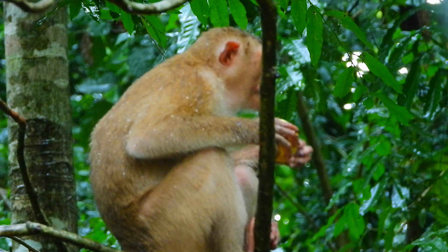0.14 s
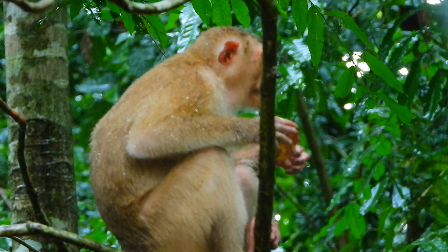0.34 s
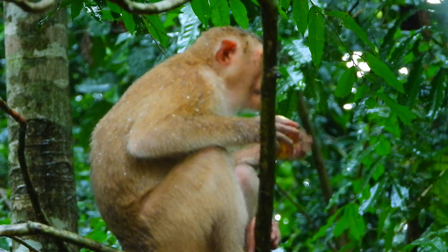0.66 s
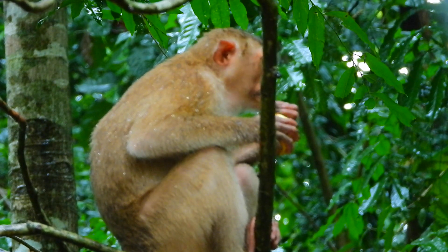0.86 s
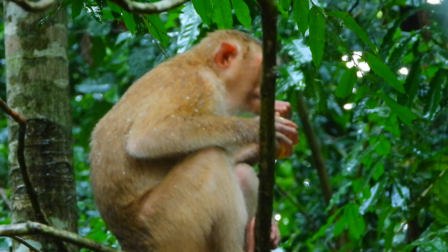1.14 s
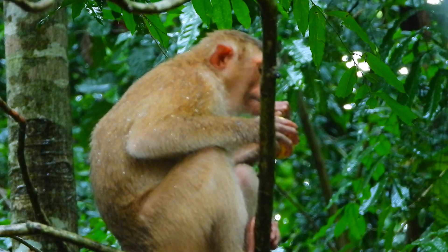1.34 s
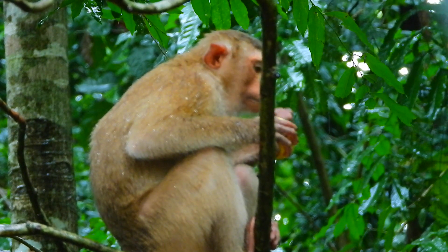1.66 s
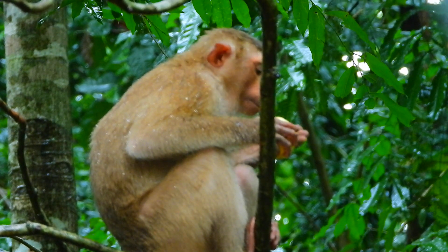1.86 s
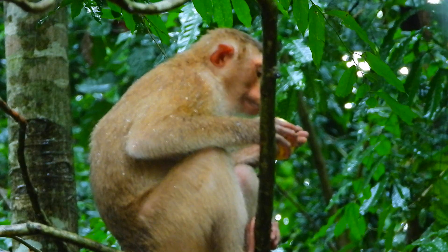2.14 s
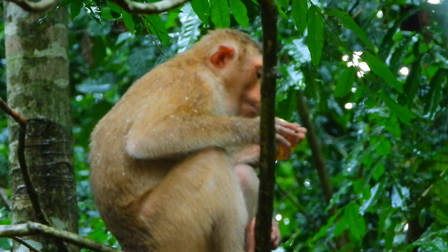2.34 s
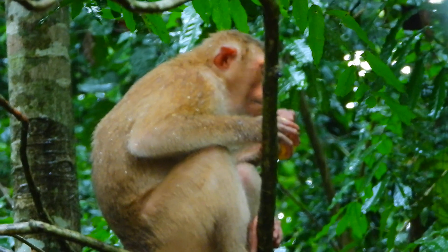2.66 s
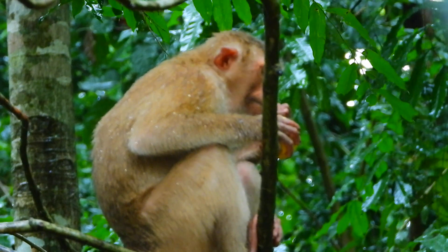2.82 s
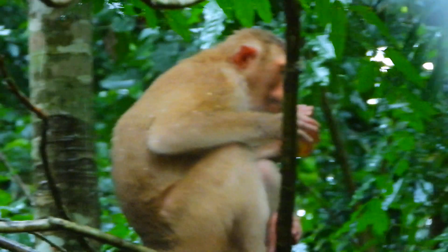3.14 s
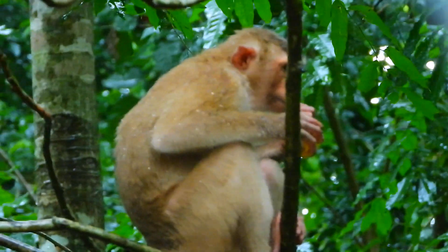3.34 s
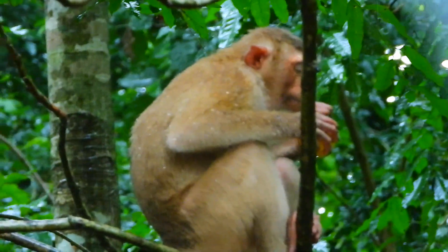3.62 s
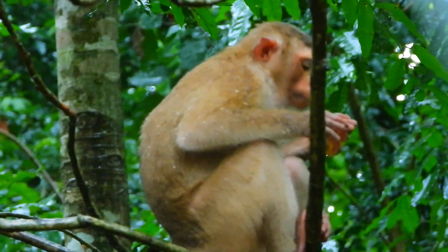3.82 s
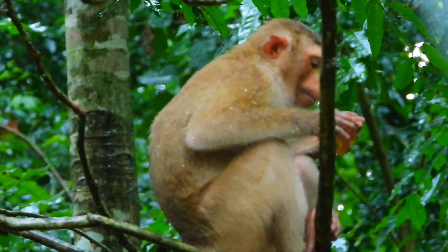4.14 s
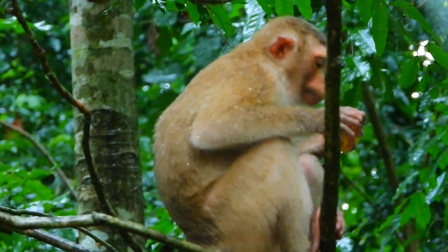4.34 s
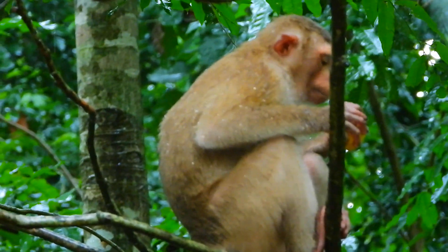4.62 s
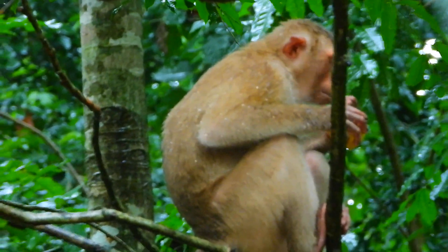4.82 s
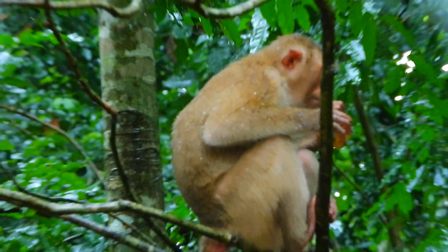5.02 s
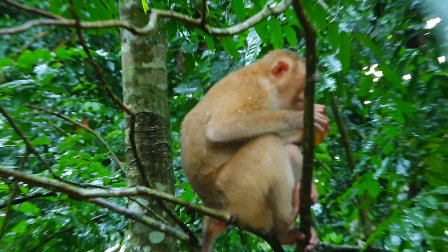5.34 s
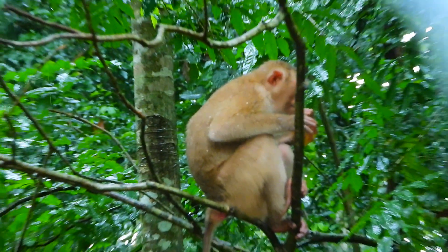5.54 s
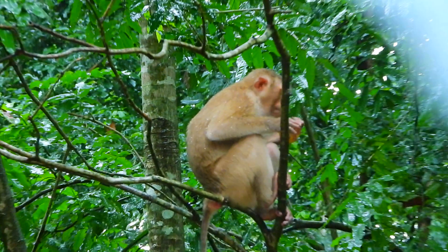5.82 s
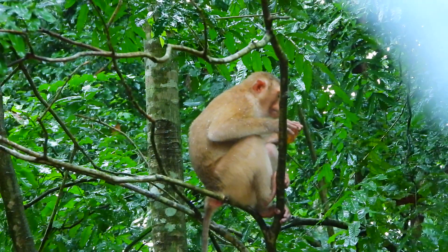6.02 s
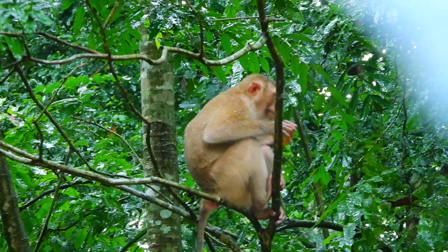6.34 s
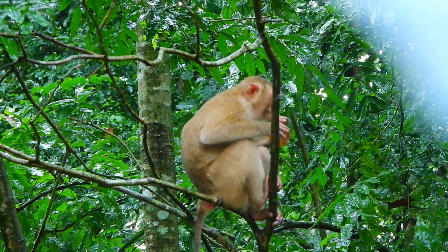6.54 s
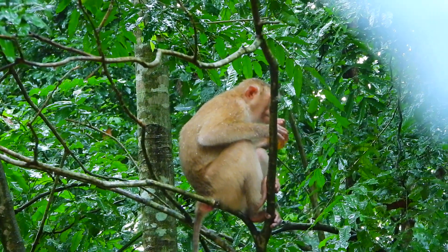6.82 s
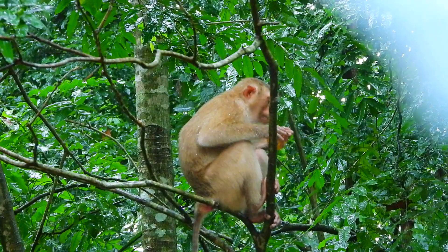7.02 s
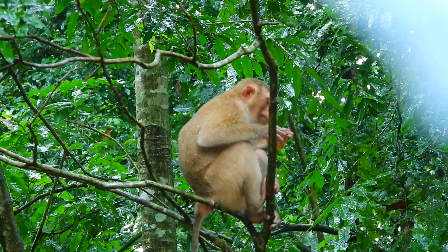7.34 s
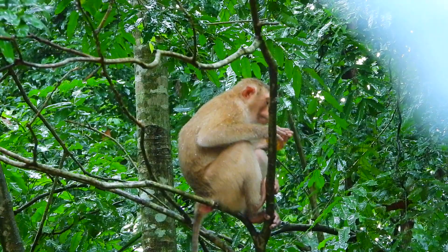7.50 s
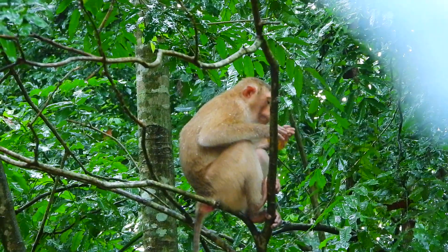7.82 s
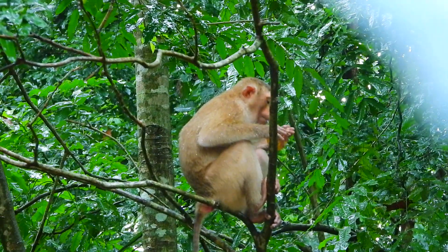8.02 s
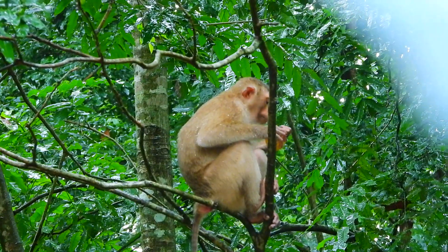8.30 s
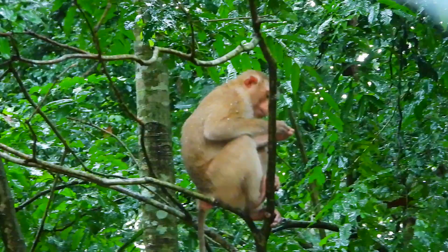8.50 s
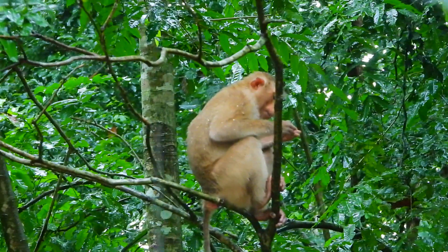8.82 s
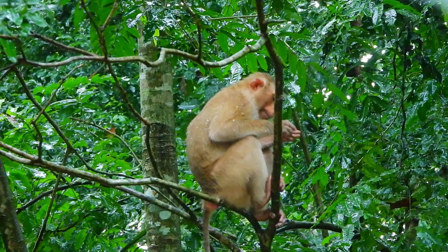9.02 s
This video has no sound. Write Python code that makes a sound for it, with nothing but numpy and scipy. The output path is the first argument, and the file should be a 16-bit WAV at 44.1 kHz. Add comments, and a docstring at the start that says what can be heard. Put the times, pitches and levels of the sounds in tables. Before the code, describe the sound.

Outdoors among wet trees, rain falls evenly as a bright hiss with fine drops. Very close to the built-in stereo microphones, hands shift on the camera: irregular knocks, clicks, skin scrapes and low rubbing, thickest from three to five seconds and again around six. The rain drops back at the knocks and recovers. After a last click at eight seconds all sound cuts out briefly, then plain rain returns. The monkey itself is not heard.

```python
"""Dense rain hisses on forest leaves: steady noise and random drops, coloured by bearing as the camera turns.
From 2.3 s fingers thump and tick on the camera body: short damped vibrations of its modes.
The palm rumbles on the grip and skin scuffs the casing, both as filtered, swelling noise.
The rain level is reset at listed times, mostly downward, and creeps back; late on all sound is cut for
half a second. Two microphone ports hear each source with their own levels and, for the rain, phases."""
import sys
import numpy as np
from scipy import signal
from scipy.io import wavfile
from scipy.ndimage import uniform_filter1d

SR = 44100
rng = np.random.default_rng(int(sys.argv[2]) if len(sys.argv) > 2 else 0)


def generate_wav(sig):
    """Save sig (samples, or channels by samples) to the path in sys.argv[1] as 16-bit PCM at SR."""
    pcm = np.round(np.clip(np.atleast_2d(sig).T, -1, 1) * 32767).astype(np.int16)
    wavfile.write(sys.argv[1], SR, pcm)


def amplitude_ratio(level_db):
    """Convert a level in decibels to the matching linear amplitude (field) ratio."""
    exponent = np.asarray(level_db, float) / 20
    return 10 ** exponent


N = 403956  # samples
HAND_LEN = round(0.08 * SR)  # samples computed for each thump or tick

# The bearing of the turning camera. Each row: time in seconds, facing (0 = first bearing, 1 = second).
FACING = [(0, 0.094), (2.9, 0.019), (3.85, 0.51), (3.92, 0.83), (8.04, 0.73), (8.56, 0.13)]


def evened(x):
    """Normalises power: scales to rms 1."""
    return x / np.sqrt(np.mean(x ** 2) + 1e-20)


def banded(x, low_hz, high_hz):
    """Band-pass filtering selects a range of pitch; the result has rms 1."""
    sos = signal.butter(2, [low_hz, high_hz], "band", fs=SR, output="sos")
    return evened(signal.sosfilt(sos, x))


def swell(length):
    """Damped envelope: rises softly, peaks at 1 after 0.71 of the length in seconds, then dies quickly."""
    u = np.arange(HAND_LEN) / (length * SR)
    return np.sqrt(2 * np.e) * u * np.exp(-u ** 2)


def knock(hz, length):
    """Damped resonance: one mode swells and is damped by the hand."""
    t = np.arange(HAND_LEN) / SR
    return swell(length) * np.sin(2 * np.pi * hz * t)


def add(mix, s, sound, pan_db=0):
    """Superposition: adds a sound from time s, with a level difference (left minus right) at the ports."""
    part = mix[:, round(s * SR):][:, :sound.shape[-1]]
    gains = amplitude_ratio(np.array([[pan_db / 2], [-pan_db / 2]]))
    part += gains * sound[..., :part.shape[1]]


def read(points, hz):
    """Interpolates spectra on a logarithmic frequency axis, one column of values each."""
    f, *values = np.transpose(points)
    return np.array([np.interp(np.log(hz + 1), np.log(f + 1), v)[:, None] for v in values])


def drift(shape, bins, frames):
    """Correlated random field: noise averaged over frequency bins and time frames, rms 1."""
    noise = rng.standard_normal(shape)
    return evened(uniform_filter1d(uniform_filter1d(noise, bins, axis=0), frames, axis=1))


def drops(per_s, spread_db, size):
    """Shot noise: drops at random instants, a few large, each a tiny decaying burst of noise."""
    sizes = amplitude_ratio(spread_db * np.minimum(rng.exponential(1, size), 3.5))
    hits = (rng.random(size) < per_s / SR) * sizes
    burst = np.exp(-np.arange(300) / (0.0014 * SR))
    power = signal.oaconvolve(hits ** 2, burst ** 2)[:size]  # the powers of overlapping drops add
    return evened(np.sqrt(abs(power)) * rng.standard_normal(size))


def rain_level_db():
    """Sawtooth gain: each row resets the level, which climbs at a steady rate to its ceiling."""
    # Resets of the rain level, mostly downward. Each row: time in seconds, level just after in dB.
    resets = [(0, -31), (2.37, -34.5), (2.62, -33), (2.865, -36.5), (2.915, -46.5), (3.31, -43.5),
              (3.46, -44), (3.885, -48), (4.1, -47.5), (4.32, -44.5), (4.58, -42), (4.715, -43.5),
              (5.73, -35), (6.34, -34.5), (6.42, -36), (6.99, -33.5), (8.3, -29)]
    # The ceiling of the climb: level at the first bearing in dB, level at the second in dB.
    steady_db = (-28.5, -25.5)
    creep_db_per_s, step_s = 8.5, 0.015
    t = np.arange(N) / SR
    s, after_db = np.transpose(resets)
    last = np.searchsorted(s, t, "right") - 1
    facing = np.interp(t, *np.transpose(FACING))
    ceiling_db = (1 - facing) * steady_db[0] + facing * steady_db[1]
    level_db = np.minimum(after_db[last] + creep_db_per_s * (t - s[last]), ceiling_db)
    return uniform_filter1d(level_db, round(step_s * SR))


def rain():
    """Filtered noise with partial coherence: hiss and drops, coloured by bearing, at two ports."""
    # Colour of the rain at each bearing. Each row: frequency in Hz, relative level in dB per Hz.
    first_colour = [(30, -52), (87, -35.5), (200, -9), (320, -7), (410, -3), (520, -2.5), (1000, -0.5),
                    (1900, 2), (2600, -2), (3700, -2), (4400, 0.5), (5000, -1.5), (6000, -8.5), (8000, -18),
                    (8900, -22), (11300, -29), (14000, -39.5), (15000, -44.5), (16200, -57)]
    second_colour = [(30, -55.5), (87, -34.5), (200, -9), (260, -9.5), (400, -5), (1000, -1), (2100, 2),
                     (2900, -0.5), (3600, 2), (4400, -5.5), (5300, -14), (6500, -13.5), (8000, -18),
                     (8900, -23), (11300, -32.5), (14000, -48.5), (16200, -46)]
    # Dip of the microphone housing: frequency in Hz, width in Hz, depth in dB.
    notch = (3940, 130, -4.5)
    # The port pair at each bearing. Each row: frequency in Hz, likeness of the ports (-1 to 1),
    # phase by which left leads in radians, level left minus right in dB.
    first_ports = [(60, 0.76, 3.5, 9), (155, 0.99, -1, 0), (400, 0.79, 0.56, 1.), (1400, 0.91, -0.4, 1.4),
                   (3400, .62, 0.62, 0.5), (4200, 0.78, 0.55, -2.5), (5400, 0.31, -0.1, -8.5),
                   (6030, 0.2, 3.5, -4.5), (7200, .3, 2.5, 2), (8120, .15, 5.5, 4), (11000, .05, 7, 3.5)]
    second_ports = [(60, .75, -1, 6.5), (160, 0.81, 0.5, -1), (1400, 0.87, 0.37, 0), (3400, 1, -1, 0.5),
                    (4270, 0.92, 0.3, 2), (4930, 0.41, 2, 1), (5800, .15, -1.9, 5), (7000, .15, -4, -2),
                    (8710, .2, -3, 4), (11000, .1, -7, -0.5)]
    near = 0.35  # share of the power in separate drops
    patch_db, leaf_ring_db, low_ring_db, low_ring_hz = 1.1, 1.44, 2.5, 600

    raw = []
    for _ in range(2):
        hiss = rng.standard_normal(N)
        raw.append(np.sqrt(1 - near) * hiss + np.sqrt(near) * drops(450, 2.25, N))
    hz, t, (common, own) = signal.stft(np.array(raw), SR, nperseg=1024, noverlap=768)
    facing = np.interp(t, *np.transpose(FACING))

    colour_db = (1 - facing) * read(first_colour, hz)[0] + facing * read(second_colour, hz)[0]
    colour_db += notch[2] * np.exp(-((hz[:, None] - notch[0]) / notch[1]) ** 2)
    # equal power in the middle band at every bearing
    band = (hz > 800) & (hz < 3800)
    colour_db -= 10 * np.log10((amplitude_ratio(colour_db[band]) ** 2).sum(0) / len(hz))
    # leaves nearer and farther make drifting patches
    colour_db += patch_db * drift(common.shape, bins=12, frames=10)
    # single leaves ring for a moment on a narrow band
    colour_db += leaf_ring_db * drift(common.shape, bins=2, frames=8)
    # broad leaves ring longer, at low pitch
    low_rings = drift(common.shape, bins=1, frames=24)
    colour_db += low_ring_db * low_rings / (1 + (hz[:, None] / low_ring_hz) ** 4)

    same, lead, sides_db = (1 - facing) * read(first_ports, hz) + facing * read(second_ports, hz)
    same, sides = np.clip(same, -0.99, 0.99), amplitude_ratio(sides_db / 2)
    left = sides * common * np.exp(1j * lead)
    right = (same * common + np.sqrt(1 - same ** 2) * own) / sides
    # size of the mean of both ports
    centre = np.sqrt(sides ** 2 + sides ** -2.0 + 2 * same * np.cos(lead)) / 2
    z = np.array([left, right]) / centre * amplitude_ratio(colour_db)
    return signal.istft(z, nperseg=1024, noverlap=768)[1][:, :N] * amplitude_ratio(rain_level_db())


def grip():
    """Friction as modulated low-band noise: a lumpy rumble while the palm shifts on the grip."""
    # Two spells of movement. Each row: time in seconds, level in dB.
    grip_spells = [
        [(2.58, -45), (2.79, -52), (2.84, -25), (2.93, -41), (3.05, -46.5), (3.5, -39.5), (3.62, -44),
         (3.7, -44), (3.75, -41), (3.88, -43), (3.93, -52), (4.55, -56), (4.64, -48)],
        [(5.68, -48), (5.95, -49), (6.36, -40), (6.47, -39.5), (6.55, -61)],
    ]
    t, level = np.arange(N) / SR, np.zeros(N)
    for rows in grip_spells:
        level += amplitude_ratio(np.interp(t, *np.transpose(rows), left=-99, right=-99))
    shared, left, right, lumps = rng.standard_normal((4, N))
    slow = evened(uniform_filter1d(uniform_filter1d(lumps, 500), 500))
    lumps = evened(amplitude_ratio(3.5 * slow))
    return level * lumps * banded(shared + 0.3 * np.array([left, right]), 156, 460)


def scuffs():
    """Friction exciting a broad resonance: crackly noise swells and fades as skin scuffs the casing."""
    # Each row: middle in seconds, length between 1/e points in seconds, level in dB, centre in Hz.
    scuff_rows = [(2.315, 0.019, -29, 1500), (2.358, 0.016, -25, 3000), (2.855, 0.018, -25, 1100),
                  (2.886, 0.01, -26, 1197), (2.901, 0.01, -28, 1300), (3.123, 0.013, -37, 2200),
                  (3.261, 0.031, -29, 2600), (3.388, 0.027, -39.5, 3000), (3.447, 0.0099, -26, 2970),
                  (3.525, 0.019, -32, 1210), (3.775, 0.021, -36, 2000), (3.85, 0.041, -25.5, 900),
                  (3.858, 0.029, -26, 2570), (4.086, 0.025, -36.5, 2480), (4.132, .02, -38.5, 2470),
                  (4.3, 0.038, -33.5, 1910), (4.569, 0.01, -27, 850), (4.651, 0.022, -41, 1200),
                  (4.683, .03, -34, 2290), (4.708, 0.025, -31.5, 2204), (5.729, 0.028, -29, 1190),
                  (6.22, 0.014, -30, 2980), (6.398, 0.039, -30, 3700), (6.972, 0.045, -33.5, 6200),
                  (7.638, 0.03, -26.5, 3700), (7.979, 0.019, -20.5, 930)]
    out = np.zeros((2, N))
    noise = rng.standard_normal((len(scuff_rows), 3, round(0.2 * SR)))
    t = np.arange(noise.shape[2]) / SR - 0.1  # zero at the middle
    for (s, length, db, hz), (a, b, grain) in zip(scuff_rows, noise):
        grain = np.clip(evened(uniform_filter1d(grain, 36)), -2, 1.8)
        crackle = evened(amplitude_ratio(6.5 * grain))
        both = np.array([a + 0.5 * b, a - 0.5 * b]) * crackle  # partly alike at the ports
        both = banded(banded(both, 0.5 * hz, 1.5 * hz), 0.37 * hz, 2.2 * hz)
        add(out, s + t[0], amplitude_ratio(db) * np.exp(-(2 * t / length) ** 2) * both)
    return out


def thumps():
    """Modal excitation: each push of the hand rings the low modes of the body, with a rough edge."""
    # Dull thumps. Each row: time in seconds, level in dB, pitch in Hz, envelope length in seconds,
    # level left minus right in dB.
    thump_rows = [(2.294, -22, 281, 0.017, 3), (2.671, -21.5, 292, 0.012, 5), (2.614, -30, 420, 0.0056, -3),
                  (2.713, -24.5, 305, 0.012, -2), (2.723, -18, 210, 0.015, -4),
                  (2.774, -25.5, 220, 0.014, -4), (2.849, -17.5, 574, .011, -13),
                  (2.848, -20, 204, .013, 1), (2.858, -23, 330, 0.0066, 0), (2.881, -24, 360, 0.01, 8),
                  (2.884, -25, 240, .012, 2), (2.897, -18.5, 666, .005, 0), (2.915, -25, 240, .008, 2),
                  (2.943, -28, 238, 0.0086, 2), (2.996, -23.5, 224, 0.0096, 2), (3.11, -14, 474, 0.0032, 3),
                  (3.302, -27.5, 520, .005, 0), (3.154, -26.5, 253, 0.0092, 2),
                  (3.259, -5, 352, 0.0078, 2.5), (3.283, -21.5, 257, 0.011, 0),
                  (3.441, -23, 487, 0.0055, 3), (3.504, -31.5, 262, 0.02, 4), (3.54, -35, 252, 0.01, 0),
                  (3.641, -34, 400, .007, 0), (3.701, -32, 550, .005, 0), (3.725, -17, 563, 0.0046, 1),
                  (3.759, -29, 283, .009, -2), (3.781, -25, 500, .008, 2), (3.847, -29, 198, 0.016, 3),
                  (3.862, -23, 756, 0.0065, 0), (3.777, -25, 205, 0.014, -1),
                  (3.887, -34.5, 219, 0.0094, 0), (4.086, -31, 210, 0.0098, -2.5),
                  (4.155, -35, 600, 0.0052, 0), (4.159, -42, 200, 0.0088, 1), (4.286, -31, 200, 0.0086, 3),
                  (4.301, -22, 267, 0.015, 2), (4.345, -34, 171, 0.013, 1), (4.41, -35, 300, 0.0073, 0),
                  (4.466, -38, 450, .008, 6), (4.364, -30, 377, 0.0098, -6),
                  (4.408, -29.5, 620, 0.0047, -3), (4.567, -22, 196, 0.01, 1), (4.568, -19, 349, 0.011, -6),
                  (4.601, -26.5, 300, .005, 2), (4.703, -23.5, 614, 0.0022, 5), (4.71, -30, 496, 0.0036, 2),
                  (5.289, -33.5, 474, 0.0066, -3), (5.729, -25, 483, .007, 1.5),
                  (5.731, -23, 1077, .005, 0), (5.791, -23.5, 381, 0.013, 5), (5.883, -25, 199, .007, 1),
                  (5.893, -13, 230, 0.01, 2), (5.927, -31, 230, .008, 0), (5.958, -36, 220, .008, 0),
                  (5.999, -33, 334, .008, 0), (6.049, -26.5, 260, 0.0075, 3), (6.084, -34, 198, 0.012, 0),
                  (6.2215, -17.5, 764, 0.0052, 8), (6.221, -26, 214, 0.02, 1), (6.298, -25, 544, .007, 5),
                  (6.34, -12, 646, 0.0024, 8), (6.387, -25.5, 340, 0.0097, -2),
                  (6.409, -24.5, 301, 0.013, .6), (6.437, -26.5, 269, 0.0096, 3)]
    # Modes of the body. Each row: multiple of the pitch, level in dB, share of the envelope length.
    body_modes = [(0.999, -2, 1.), (1.499, -17.5, 1), (2.8, -16, 0.26)]
    out = np.zeros((2, N))
    detune = rng.uniform(0.88, 1.12, (len(thump_rows), len(body_modes)))
    noise = rng.standard_normal((len(thump_rows), HAND_LEN))
    for (s, db, hz, length, pan_db), off, grit in zip(thump_rows, detune, noise):
        sound = 0.14 * banded(grit, 0.6 * hz, 2.33 * hz) * swell(1.3 * length)
        for (multiple, mode_db, share), shift in zip(body_modes, off / off[0]):
            sound += amplitude_ratio(mode_db) * knock(hz * multiple * shift, length * share)
        add(out, s - 0.003, amplitude_ratio(db) * sound / abs(sound).max(), pan_db)
        # the shock also flexes the two ports against each other
        flex = knock(np.clip(1.305 * hz, 300, 500) * off[1], 0.9 * length)
        add(out, s, amplitude_ratio(db - 12.5) * np.outer([1, -1], flex))
    return out


def ticks():
    """Impact response: modes of the casing ring for a few cycles under a crack of treble."""
    # Sharp ticks. Each row: time near the peak in seconds, low mode level in dB, low mode in Hz,
    # middle mode level in dB, middle mode in Hz, housing ring level in dB, crack level in dB,
    # top treble level in dB.
    tick_rows = [(2.3566, -15, 1440, -7, 2360.0, -10, -27, -27),
                 (2.4343, -30, 1140.0, -17, 2370.0, -27.0, -38.0, -61.0),
                 (2.85, -12, 1210.0, -30.0, 2790.0, -42.0, -40.5, -49.0),
                 (2.8576, -20, 980.0, -31, 1820.0, -35.0, -39, -48.0),
                 (2.883, -18, 1170.0, -30, 2250.0, -38.0, -44.0, -45),
                 (2.898, -13.5, 1140.0, -13, 2190, -14, -23, -28),
                 (2.9109, -25, 1490.0, -29, 1880.0, -21, -37.0, -50.0),
                 (2.9955, -34.0, 940.0, -32.0, 2780.0, -29, -36, -59.0),
                 (3.0461, -38.0, 1510.0, -32, 2300.0, -33, -43.0, -62.0),
                 (3.1087, -20, 668, -36, 1940.0, -38.0, -46.0, -56.0),
                 (3.1187, -26, 1400.0, -19.5, 3720, -29, -29, -53.0),
                 (3.1992, -31, 1250.0, -32, 1960, -56.0, -57.0, -65.0),
                 (3.2582, -21, 690.0, -27, 2540, -17, -35, -36),
                 (3.272, -34, 660.0, -21, 2750.0, -33.0, -41.0, -58.0),
                 (3.299, -25, 1060, -19.5, 3480, -20, -28, -42),
                 (3.3777, -37, 1180.0, -27, 2450.0, -52.0, -52.0, -56.0),
                 (3.395, -32, 730.0, -26, 3100.0, -36.0, -39.0, -57.0),
                 (3.446, -24, 1050, -22, 3250, -16.5, -21.5, -50),
                 (3.5033, -22.5, 1090.0, -30.0, 2150.0, -55.0, -66.0, -65.0),
                 (3.7255, -10.5, 1170, -14, 1760, -26, -37, -57.0),
                 (3.781, -18, 1230, -13, 3400, -29, -23, -40),
                 (3.7923, -33.0, 1070.0, -17, 2250.0, -47, -42.0, -57.0),
                 (3.827, -16.5, 850.0, -19, 2290.0, -47.0, -38, -70.0),
                 (3.8395, -16, 980.0, -19, 2110.0, -46.0, -38, -36),
                 (3.8545, -17, 1040.0, -28, 3020.0, -24, -32, -35),
                 (3.8626, -11.5, 1250, -7.5, 3600, -9, -13.5, -15.5),
                 (4.052, -24, 1300, -16.5, 2450.0, -28, -41.0, -77.0),
                 (4.075, -40, 890, -34.0, 3200, -42.0, -44.0, -60.0),
                 (4.0877, -29, 750, -32, 2920, -32, -36, -50),
                 (4.0955, -35, 980.0, -36, 3110.0, -38.0, -38, -44),
                 (4.1306, -31, 1200.0, -28, 2960, -32, -40, -43),
                 (4.2845, -31, 900, -30, 1900, -45, -55, -70),
                 (4.2953, -17, 1160, -14, 3360, -28, -38, -73.0),
                 (4.306, -18.5, 657, -23, 3160, -29, -47.0, -63.0),
                 (4.3666, -22.5, 1250.0, -23, 1820.0, -47.0, -63.0, -69.0),
                 (4.4068, -40, 770.0, -36.0, 2610.0, -46.0, -49.0, -49),
                 (4.463, -26.5, 1150.0, -31, 1990.0, -58.0, -63.0, -76.0),
                 (4.5717, -15.5, 1080, -18.5, 2060, -32, -47.0, -64.0),
                 (4.596, -27, 880.0, -47.0, 3070.0, -49.0, -62.0, -63.0),
                 (4.6999, -12.5, 1700, -2.5, 2550, -38, -22, -36),
                 (5.3636, -25.5, 1420.0, -21, 2140.0, -29, -49.0, -59.0),
                 (5.728, -16, 1120, -16, 2090, -30, -44.0, -32),
                 (5.8913, -16, 720.0, -13, 2230, -33.0, -45.0, -50.0),
                 (6.2214, -16.0, 930.0, -9.5, 2920.0, -17, -24.5, -56.0),
                 (6.297, -19, 1050.0, -7, 2690.0, -16, -16.5, -20),
                 (6.3372, -14.5, 1100, -7.5, 2260.0, -22.0, -42.0, -42.0),
                 (6.3829, -46.0, 1200.0, -27, 3400.0, -31.0, -36.0, -44.0),
                 (6.3944, -36.0, 1090.0, -20.0, 3520, -28, -28.5, -37),
                 (6.3885, -31, 1000, -22, 4100, -30, -40, -50),
                 (6.4044, -43.0, 820.0, -9.5, 3820, -21, -21.5, -28),
                 (6.4055, -41, 820.0, -10.5, 3820, -26, -32, -39),
                 (6.963, -34, 1290.0, -30, 2830.0, -19, -13, -21),
                 (6.976, -32.0, 1010.0, -32, 2450.0, -32.0, -27.0, -27),
                 (6.9812, -41.0, 1200.0, -34, 2490.0, -34, -26.0, -33),
                 (7.3881, -28.0, 1490.0, -16, 2740.0, -32.0, -33, -51.0),
                 (7.6242, -42.0, 1220.0, -28.0, 2940.0, -20, -28, -48.0),
                 (7.9807, -11, 980.0, -14, 2380.0, -23, -30.0, -50.0)]
    ring_hz, crack_hz = 4430, 6700
    mid, ring, crack = 0.00068, 3.8 / ring_hz, 2.8 / crack_hz  # envelope lengths in seconds
    out = np.zeros((2, N))
    noise = rng.standard_normal((len(tick_rows), 3, HAND_LEN))
    pans_db = 0.2 + 3 * rng.standard_normal((len(tick_rows), 2))
    t = np.arange(HAND_LEN) / SR
    for row, (a, b, c), pan in zip(tick_rows, noise, pans_db):
        s, low_db, low_hz, mid_db, mid_hz, ring_db, crack_db, top_db = row
        low = 1.6 / low_hz
        add(out, s - low / 2, amplitude_ratio(low_db) * knock(low_hz, low), pan[0])
        # neighbouring modes ring on, falling 60 dB in 17 ms
        shiver = banded(banded(a, 0.62 * mid_hz, 1.6 * mid_hz), 0.31 * mid_hz, 1.5 * mid_hz)
        shiver *= amplitude_ratio(-10.0 - 60 * t / 0.017) * (1 - np.exp(-t / mid))
        middle = knock(mid_hz, mid) + 0.29 * knock(1.4 * mid_hz, 0.8 * mid) + shiver
        add(out, s - mid / np.sqrt(2), amplitude_ratio(mid_db) * middle, pan[1])
        add(out, s - ring / 2, amplitude_ratio(ring_db) * knock(ring_hz, ring), -pan[0])
        add(out, s - crack / np.sqrt(2), amplitude_ratio(crack_db) * knock(crack_hz, crack), -pan[1])
        # the top treble reaches the two ports by different paths
        top = banded(banded(np.array([b + c, b - c]), 7800, 12500), 7800, 14000)
        top *= (t / 0.0005 * np.exp(1 - t / 0.0005)) ** 2
        add(out, s - 0.0007, amplitude_ratio(top_db) * top / abs(top.mean(0)).max(), -pan[1])
    return out


def scene():
    """Superposes the rain and the hand on the camera, which carries little deep bass."""
    hand = grip() + scuffs() + thumps() + ticks()
    # slow pushes move both ports alike
    low_pass = signal.butter(2, 190, "low", fs=SR, output="sos")
    apart = signal.sosfilt(low_pass, hand[0] - hand[1]) / 2
    hand = hand - np.outer([1, -1], apart)
    high_pass = signal.butter(4, 140, "high", fs=SR, output="sos")
    return rain() + signal.sosfilt(high_pass, hand)


def top_cut(x):
    """Nothing passes above the cut-off."""
    return signal.sosfilt(signal.butter(12, 16990, fs=SR, output="sos"), x)


def record(dry):
    """Saturation and band limiting: a soft overload, a low-pass, and fades into and out of silence."""
    # The cut: start of silence in seconds, end in seconds.
    silence = (8.036, 8.568)
    mix = dry / (1 + (dry / 1.1) ** 4) ** 0.25
    low_pass = signal.firwin(255, 16300, window=("kaiser", 8), fs=SR)
    mix = signal.oaconvolve(mix, low_pass[None], "same")
    t = np.arange(N) / SR
    fade_out, fade_in = (silence[0] - t) / 0.013, (t - silence[1]) / 0.016
    mix = mix * np.clip(np.maximum(fade_out, fade_in), 0, 1)
    return top_cut(mix)


dry = scene()
out = record(dry)
generate_wav(out)
```